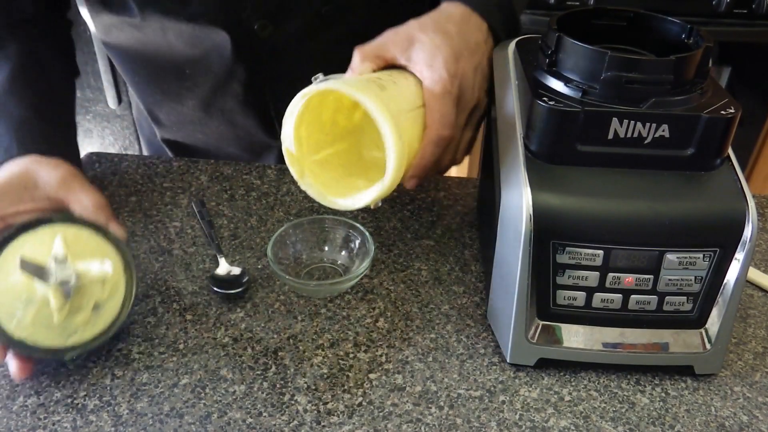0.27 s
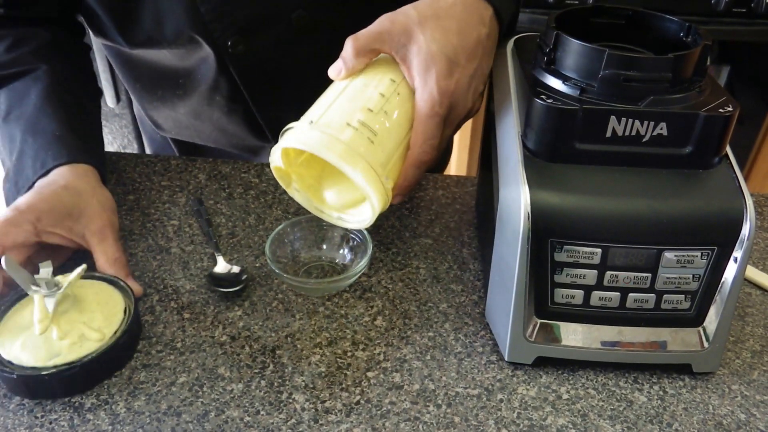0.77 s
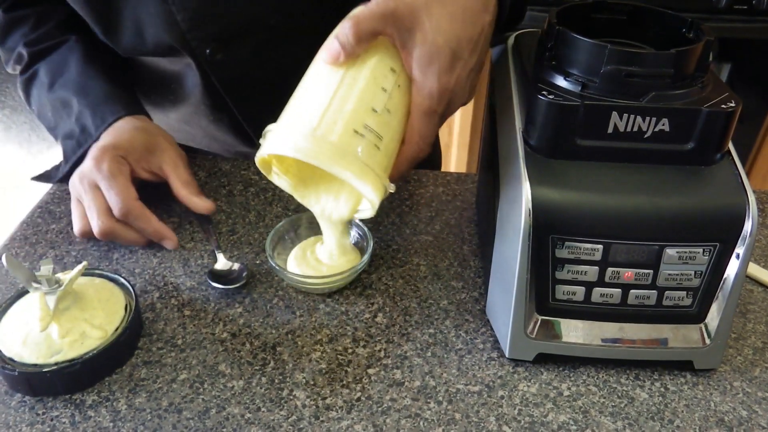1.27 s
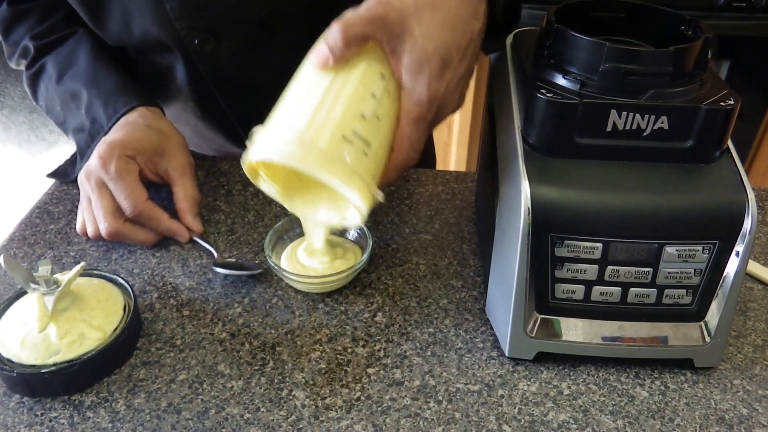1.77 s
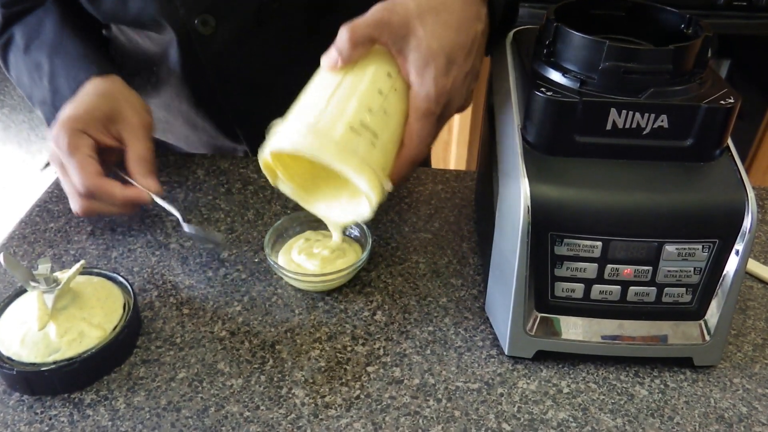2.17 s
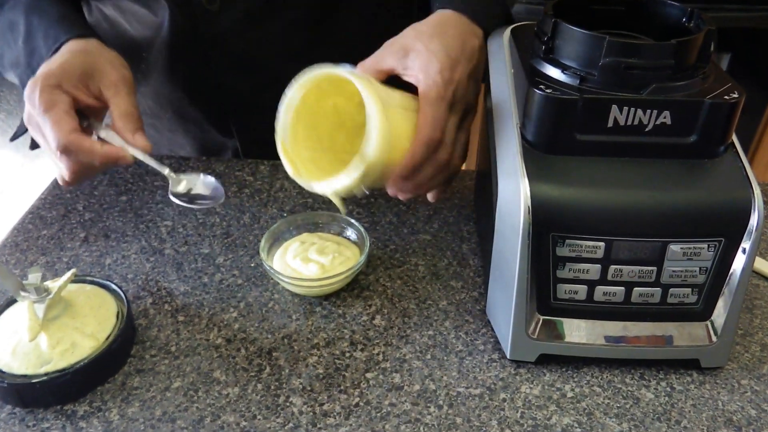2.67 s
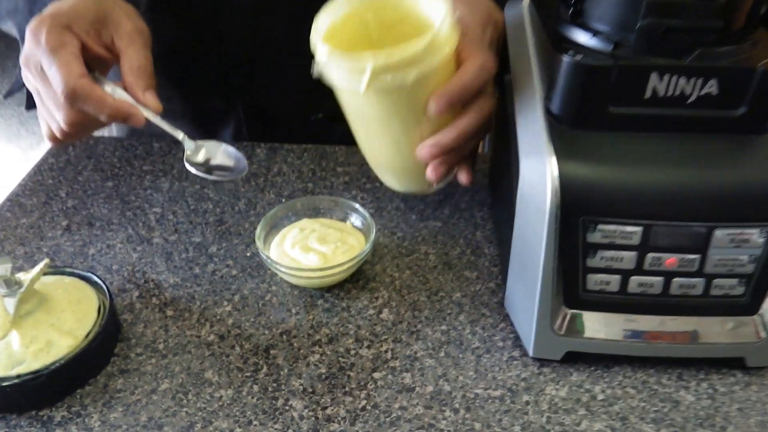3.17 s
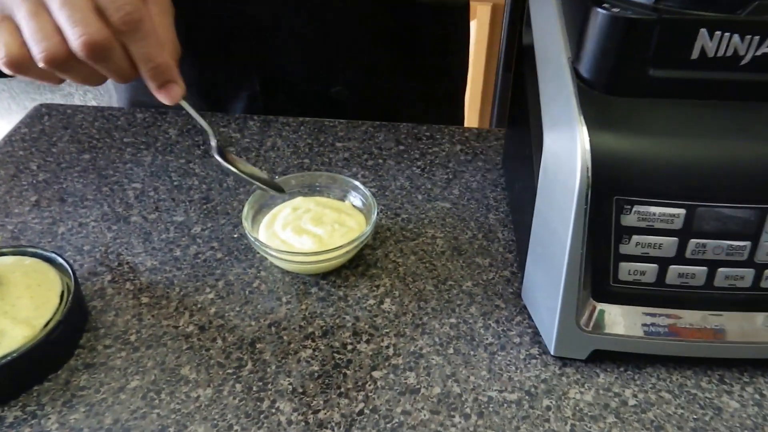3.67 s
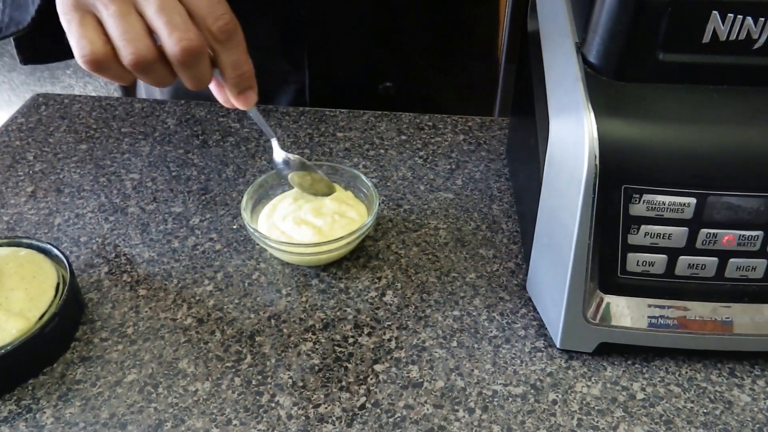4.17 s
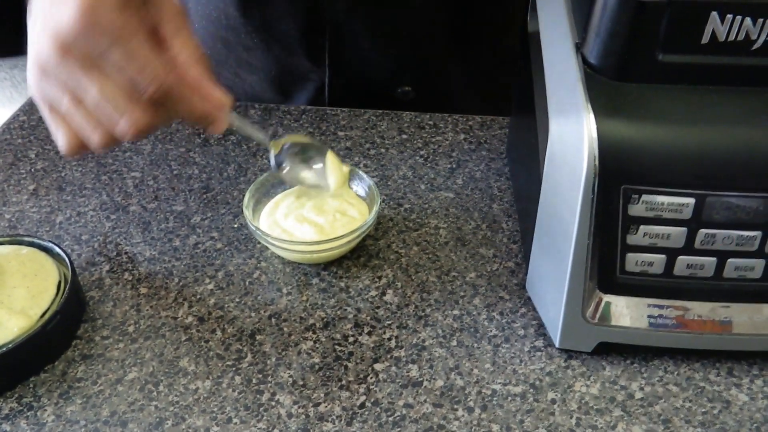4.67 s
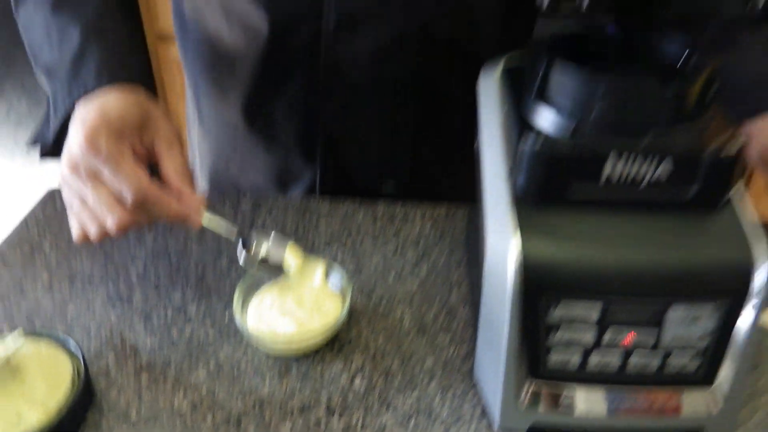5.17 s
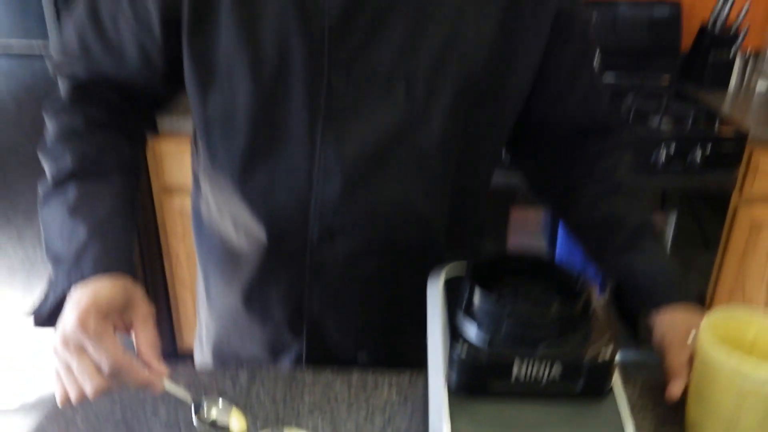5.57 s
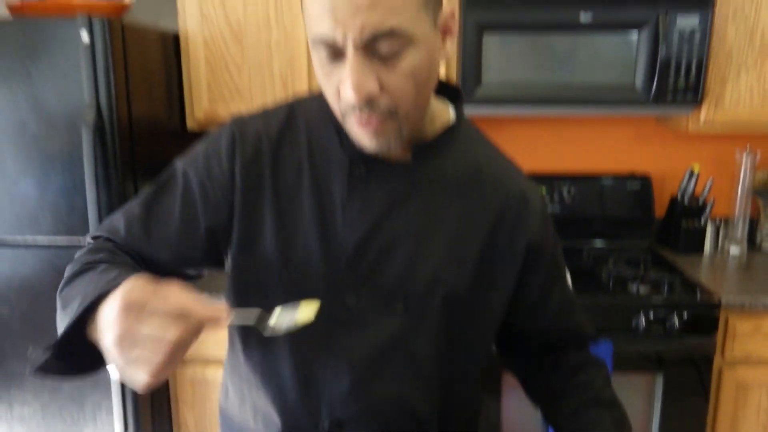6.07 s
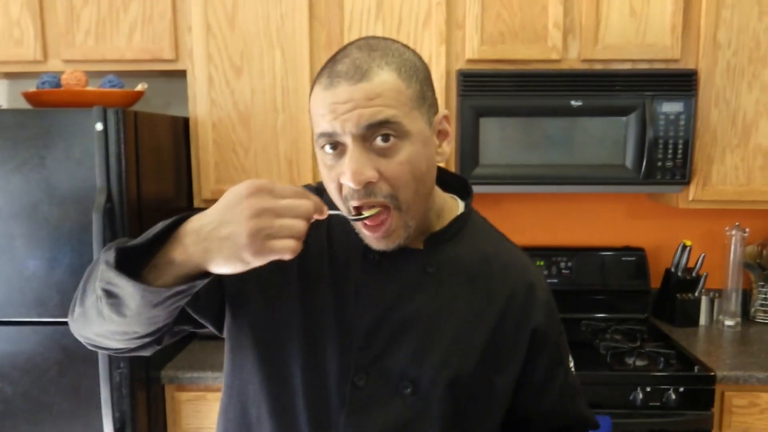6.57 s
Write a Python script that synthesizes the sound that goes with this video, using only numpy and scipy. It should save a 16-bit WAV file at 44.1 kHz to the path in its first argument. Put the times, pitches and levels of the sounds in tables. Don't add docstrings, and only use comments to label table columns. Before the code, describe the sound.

Scattered kitchen handling: plastic lid slap, ringing spoon drag, hollow cup thuds, bright glass taps, then only soft cloth rustle and a low fridge hum.

```python
import sys
import numpy as np
from scipy import signal
from scipy.fft import rfft, irfft, next_fast_len
from scipy.io import wavfile
from scipy.ndimage import uniform_filter1d

SR = 44100
rng = np.random.default_rng(int(sys.argv[2]) if len(sys.argv) > 2 else 0)


def transcribe(signal):
    frames = np.atleast_2d(signal).T
    limited = np.clip(frames, -1, 1)
    pcm = np.round(limited * 32767).astype(np.int16)
    wavfile.write(sys.argv[1], SR, pcm)


def level_to_linear(level):
    exponent = np.asarray(level, float) / 20
    return 10 ** exponent


N = 300100


def colour(x, shape):
    hz, db = np.transpose(shape)
    size = next_fast_len(len(x))
    log_hz = np.log(np.fft.rfftfreq(size, 1 / SR) + 1)
    gain = level_to_linear(np.interp(log_hz, np.log(hz), db))
    y = irfft(rfft(x, size) * gain, size)[:len(x)]
    return y / np.std(y)


def walk(rate):
    hold = int(SR / rate)
    steps = np.repeat(rng.standard_normal(N // hold + 1), hold)
    return 1.55 * uniform_filter1d(uniform_filter1d(steps, hold), hold)[:N]


# (frequency [Hz], T60 [s])
ROOM_T60 = [(100, 0.42), (400, 0.4), (1500, 0.49), (4000, 0.29), (8000, 0.25), (13000, 0.063)]


def room():
    t = np.arange(int(.5 * SR)) / SR
    hz, t60 = np.transpose(ROOM_T60)
    out = 0
    for f in [*60 * 2 ** np.arange(8), 14000]:
        band = signal.butter(2, [f / np.sqrt(2), f * np.sqrt(2)], "band", fs=SR, output="sos")
        decay = np.exp(-np.log(1000) * t / np.interp(np.log(f), np.log(hz), t60))
        out = out + signal.sosfilt(band, rng.standard_normal(len(t))) * decay
    out *= 1 - np.exp(-t / 0.0032)
    return out / np.sqrt(np.sum(out ** 2))


def partials(hz, shape):
    return np.column_stack([hz, shape])


def ring(modes):
    hz, width, db = np.transpose(modes)[:, :, None]
    t = np.arange(int(.4 * SR)) / SR
    width = np.maximum(width, 3)
    damped = np.sin(2 * np.pi * hz * t) * np.exp(-np.pi * width * t)
    y = np.sum(level_to_linear(db) * width * damped, axis=0)
    return y / np.max(np.abs(y))


def burst(decay_ms, shape, count):
    t = np.arange(count) / SR
    snap = 1 + 1.8 * np.exp(-t / 0.00027)
    envelope = snap * np.exp(-1000 * t / max(decay_ms, .2)) * (1 - np.exp(-t / .0001))
    x = rng.standard_normal(count) * envelope
    tones = rfft(x)
    even = irfft(tones / np.sqrt(uniform_filter1d(np.abs(tones) ** 2, size=50)), count)
    y = colour(even, shape) * (t < t[-1] / 2)
    return y * np.sqrt(np.sum(x ** 2) / np.sum(y ** 2))


def knocks(events, modes, crack_colour, crack_ms, ring_room_db=0, caught_db=0):
    out, body = np.zeros(N + 2 * SR), ring(modes)
    caught = np.clip((np.arange(len(body)) / SR - .009) / 0.0023, 0, 1)
    body = body * level_to_linear(caught_db * caught)
    crack_per_contact = 9.7
    for s, db, crack_db, room_db, contact_ms in events:
        crack = burst(crack_ms + crack_per_contact * contact_ms, crack_colour, count=8192)
        crack = np.pad(crack, (0, len(body) - len(crack)))
        soft = np.exp(-1000 / SR / max(contact_ms, .003))
        y = body * level_to_linear(np.array([[0], [ring_room_db]])) + level_to_linear(crack_db) * crack / 2
        direct, feed = level_to_linear(db) * signal.lfilter([(1 - soft) ** 2], [1, -2 * soft, soft ** 2], y)
        heard = level_to_linear(room_db) * signal.fftconvolve(feed, room())
        heard[:len(direct)] += direct
        out[int(s * SR):][:len(heard)] += heard
    return out[:N]


def rub(stroke, modes, rasp_colour, rasp_db):
    t = np.arange(N) / SR
    s, db = np.transpose(stroke)
    fade = np.clip(np.minimum(t - s[0], s[-1] - t) / 0.02, 0, 1)
    uneven_db, patchy_db = 3.5, 2.5
    roughness = uneven_db * np.minimum(rng.exponential(size=N), 3) + patchy_db * walk(70)
    grit = rng.standard_normal(N) * level_to_linear(roughness)
    grit *= rng.random(N) < .3
    force = level_to_linear(np.interp(t, s, db)) * fade
    body = ring(modes)
    rung = signal.fftconvolve(force * grit / np.std(grit), body / np.sqrt(np.sum(body ** 2)))[:N]
    return rung + level_to_linear(rasp_db) * force * colour(grit, rasp_colour)


# (frequency [Hz], density [dB per Hz])
HOUSE = [(12, -23.5), (25, -10.5), (60, -4), (130, -1), (250, -6.5), (500, -40)]


def house_rumble():
    return level_to_linear(-64.5 + 2.5 * walk(3)) * colour(rng.standard_normal(N), HOUSE)


# (frequency [Hz], density [dB per Hz])
MIC_HISS = [(2000, -19.5), (8000, -4), (15000, 0.5)]


def microphone_hiss():
    return level_to_linear(-79.5) * colour(rng.standard_normal(N), MIC_HISS)


# (time [s], depth [dB], fall [s])
DUCKS = [
    (.905, 7, .05),
    (3.01, 8, 0.045),
    (4.105, 9, 0.13),
    (4.67, 1.6, 0.11),
    (5.01, 10, .05),
    (5.189, 14, 0.15),
]


def gain_control():
    hold_s, recover_db_per_s, resting_db = 0.15, 12.5, -42
    t = np.arange(N) / SR
    gain_db = resting_db
    for s, db, fall in DUCKS:
        times = s + np.cumsum([0, max(fall, .01), hold_s, abs(db) / recover_db_per_s])
        gain_db = gain_db - np.interp(t, times, [0, db, db, 0])
    return level_to_linear(gain_db)


# (frequency [Hz], density [dB per Hz])
FRIDGE_AIR = [(15, -47.5), (25, -20.5), (49, -9.5), (87, -12), (137, -3.5), (190, -5.5), (217, -0.5),
              (263, -10), (285, -3.5), (476, -9), (714, -8), (775, -15.5), (6210, -26), (14400, -36),
              (16000, -36.5)]
# (frequency [Hz], rms level [dB])
FRIDGE_LINES = [(59.2, -54), (145.3, -49.5), (183.0, -53.5), (220.7, -50), (290.7, -59.5), (328.4, -57),
                (366.1, -59.5), (436.0, -56.5), (473.7, -56), (549.1, -60.5), (1008, -66), (2040, -68.5)]


def fridge():
    t = np.arange(N) / SR
    hum = 0
    for hz, db in FRIDGE_LINES:
        level = np.sqrt(2) * level_to_linear(db + 1.5 * walk(8.2))
        cycles = hz * t + rng.random() + 0.21 * walk(4.3)
        hum = hum + level * np.sin(2 * np.pi * cycles)
    air = colour(rng.standard_normal(N), FRIDGE_AIR) * level_to_linear(1.0 * walk(15))
    return gain_control() * (level_to_linear(-2.5) * air + level_to_linear(41.5) * hum)


# (time of fastest motion [s], length [s], level [dB], brightness [0-1])
SLEEVE = [(0.064, 0.44, -49.5, .5), (0.347, 0.53, -36.5, 0.7), (0.635, 0.19, -39, 0.67),
          (1.15, 0.45, -38, 0), (1.422, 0.33, -47, 0.4), (1.95, 0.53, -45, .45), (2.358, 0.7, -39, 0.37),
          (3.533, 0.28, -45, 0.36), (3.723, 0.22, -38.5, 0.36), (3.89, 0.36, -44.5, 0.3),
          (5.492, 0.34, -59.5, 0.2), (6.659, 1, -46, 0.2)]
# (frequency [Hz], density [dB per Hz])
CLOTH_DULL = [(400, -28.5), (1000, -8), (2000, -10.5), (5000, -7.5), (8000, -10), (15000, -24.5)]
# (frequency [Hz], density [dB per Hz])
CLOTH_BRIGHT = [(400, -32), (2000, -0.5), (4500, 2.5), (6500, 8.5), (9000, -34.5), (15000, -19)]


def sleeves():
    s, length, db, bright = np.transpose(SLEEVE)[:, :, None]
    bright = np.clip(bright, 0, 1)
    phase = np.clip((np.arange(N) / SR - s) / length, -.5, .5)
    stroke = level_to_linear(db - 9.0) * np.cos(np.pi * phase).clip(0) ** 1.3
    grain_db = 3.8 * np.minimum(rng.exponential(size=N), 6) + 0.5 * walk(30)
    grains = rng.standard_normal((2, N)) * level_to_linear(grain_db)
    dull = np.sum(stroke * np.sqrt(1 - bright), axis=0) * colour(grains[0], CLOTH_DULL)
    return dull + np.sum(stroke * np.sqrt(bright), axis=0) * colour(grains[1], CLOTH_BRIGHT)


# (time [s], peak [dB], frequency [Hz], width [Hz])
THUMPS = [
    (0.473, -29, 80, 13),
    (.906, -29, 75, 14),
    (4.107, -26, 65, 12),
    (5.009, -30.5, 105, 13),
]


def slab_thumps():
    s, db, hz, width = np.transpose(THUMPS)[:, :, None]
    t = np.maximum(np.arange(N) / SR - s, 0)
    swell = np.exp(-np.pi * width * t) * (1 - np.exp(-t / 0.018))
    return np.sum(level_to_linear(db) * np.sin(2 * np.pi * hz * t) * swell, axis=0)


# (time [s], ring peak [dB], crack over ring [dB], room share [dB], contact [ms])
CRUMBS = [(6.281, -47, 11, -14, 0.028), (1.8846, -54, 10, -18, .01), (2.4847, -42, 11, -5, 0.011),
          (3.329, -54, 10, -18, .02), (4.2345, -46, 12, -10, 0.014), (5.5144, -64, 12.6, -6, 0.053),
          (6.457, -50, 11, -15, .02)]
# (frequency [Hz], width [Hz], level [dB])
CRUMB = [(6500, 2500, -1)]
# (frequency [Hz], density [dB per Hz])
CRUMB_CRACK = [(1000, -18), (3000, 4), (6000, 3.5), (10000, 0.5), (15000, -15)]
# (time [s], ring peak [dB], crack over ring [dB], room share [dB], contact [ms])
SMALL_TICK = [(.4185, -26.5, 3, -13.5, 0.03), (5.478, -53, 2.5, -12, .03), (5.513, -63, 5.5, -8, .02),
              (6.158, -58, 3, -14, .03), (6.1955, -30.5, 5.7, -13, 0.04)]
# (frequency [Hz], width [Hz], level [dB])
TICK = [(920, 74, -8), (1430, 150, -1), (3245, 170, -11)]
# (frequency [Hz], density [dB per Hz])
TICK_CRACK = [(350, -40.5), (600, -12), (2210, -17), (3250, 3.5), (3890, -17), (8860, -15.5),
              (16000, -34.5)]


def crumbs_and_ticks():
    return knocks(SMALL_TICK, TICK, TICK_CRACK, 2.7) + knocks(CRUMBS, CRUMB, CRUMB_CRACK, 2.1)


# (time [s], ring peak [dB], crack over ring [dB],
# room share [dB], contact [ms])
PRE_CLICK = [(6.1922, -30.5, 4, -7, .02)]
# (time [s], ring peak [dB], crack over ring [dB], room share [dB], contact [ms])
GRAZES = [(7.2, -44, 9.3, -12, .012), (6.575, -41, 8, -12, .09), (4.38, -54, 6, -12, .03),
          (6.415, -48.5, 9.7, -16, .008)]


def faint_grazes():
    return knocks(PRE_CLICK, TICK, TICK_CRACK, 1.6) + knocks(GRAZES, CRUMB, CRUMB_CRACK, 2.2)


# (time [s], ring peak [dB], crack over ring [dB], room share [dB], contact [ms])
LID_PIP = [
    (.3664, -26, -2, -14, .015),
    (.4185, -35, 1.5, -14, .015),
]
# (frequency [Hz], width [Hz], level [dB])
LID_PIP_BODY = [(3400, 120, 0.5), (5600, 160, -1), (7900, 200, -1.5)]
# (time [s], ring peak [dB], crack over ring [dB], room share [dB], contact [ms])
LID_SNAP = [(.9043, -20.5, 12, -30.5, 0.0072)]
# (frequency [Hz], density [dB per Hz])
SNAP_CRACK = [(4000, -29), (9000, -6.5), (12000, 1), (16000, 1.5)]


def faint_lid():
    return knocks(LID_PIP, LID_PIP_BODY, CRUMB_CRACK, 1.5) + knocks(LID_SNAP, CRUMB, SNAP_CRACK, .6)


# (time [s], ring peak [dB], crack over ring [dB], room share [dB], contact [ms])
CUP_ROCK = [
    (4.1078, -23.5, 6.9, -3, .03),
    (4.1112, -15, 7, -16, .03),
]
# (frequency [Hz], width [Hz], level [dB])
CUP_BASE = [(223, 7.7, -9.5), (273, 27.5, 5.5), (464, 22, -8), (543, 19, -16), (1032, 74, -20.5)]
# (frequency [Hz], density [dB per Hz])
CUP_BASE_CRACK = [(90, -43.5), (170, -32.5), (300, -20), (800, -11), (1660, -14), (3000, -16.5),
                  (5200, -13.5), (9000, -19.5), (16000, -36)]


def faint_cup():
    return knocks(CUP_ROCK, CUP_BASE, CUP_BASE_CRACK, 1.5)


# (time [s], ring peak [dB], crack over ring [dB], room share [dB], contact [ms])
SCOOP_REBOUND = [(4.6706, -11, 3, -20, .015)]
GLASS_HZ = [2100, 4345, 4535, 4790, 7550, 7785, 7915, 8015, 8175, 8275, 12120]
# (width [Hz], level [dB])
BOWL = [(60, -4), (90.6, -11.5), (88.7, -22), (90.4, -16.5), (120, -21), (90.5, -20), (80, 22),
        (59.7, -17.5), (60.1, -17), (60.2, -20.5), (60, -26)]
# (frequency [Hz], density [dB per Hz])
BOWL_CRACK = [(300, -34), (1000, -16.5), (3080, -6.5), (3700, -14), (4800, 5.5), (6850, -16), (7800, -7.5),
              (9390, -36.5), (16000, -47)]
# (time [s], level [dB])
STIR = [(4.27, -70), (4.33, -66), (4.45, -68.5), (4.56, -65.5), (4.66, -61.5)]
# (frequency [Hz], width [Hz], level [dB])
BOWL_STIRRED = [(4200, 15, 0.5), (7915, 20, -18)]


def faint_bowl():
    rebound = knocks(SCOOP_REBOUND, partials(GLASS_HZ, BOWL), BOWL_CRACK, 1.8)
    return rebound + rub(STIR, BOWL_STIRRED, BOWL_CRACK, rasp_db=-21)


# (time [s], level [dB])
CARRY = [(1.84, -66), (1.87, -64), (1.95, -67), (2.02, -61), (2.06, -62)]
# (frequency [Hz], width [Hz], level [dB])
SPOON_CARRIED = [(6410, 30, -10), (11885, 18, 0.5)]
# (frequency [Hz], density [dB per Hz])
SPOON_CRACK = [(200, -9.5), (800, -12.5), (1500, -3.5), (2700, -3), (4350, -11), (6520, -6.5), (9230, -17),
               (12200, -25.5), (16000, -34.5)]
# (time [s], ring peak [dB], crack over ring [dB], room share [dB], contact [ms])
SPOON_NUDGES = [
    (2.0545, -40, -2, -12, .03),
    (2.073, -41, -2, -12, .03),
    (4.598, -45, 3.5, -9.5, .03),
    (4.6445, -40, 2.5, -14.5, .02),
]
# (frequency [Hz], width [Hz], level [dB])
NUDGE_BODY = [(2380, 250, -6), (3500, 200, 1), (5100, 300, -1.5)]


def faint_spoon():
    carried = rub(CARRY, SPOON_CARRIED, SPOON_CRACK, rasp_db=-15)
    return carried + knocks(SPOON_NUDGES, NUDGE_BODY, BOWL_CRACK, 2.5)


# (time [s], level [dB])
LID_SLIDE = [(.85, -60), (.875, -55), (.895, -53), (.92, -53)]
# (frequency [Hz], density [dB per Hz])
LID_SCUFF = [(2000, -23), (4500, -9.5), (6300, -5), (7500, -13.5), (12000, -19)]


def lid_slide():
    return rub(LID_SLIDE, CRUMB, LID_SCUFF, rasp_db=6.5)


# (time [s], level [dB])
SCRAPES = [
    [(4.575, -63), (4.597, -59), (4.627, -71), (4.645, -50.5), (4.655, -67)],
    [(4.686, -42), (4.7, -37), (4.716, -46.5)],
]


def bowl_scrapes():
    return sum(rub(stroke, partials(GLASS_HZ, BOWL), BOWL_CRACK, rasp_db=7.0) for stroke in SCRAPES)


SPOON_HZ = [1575, 2980, 4300, 4615, 4885, 6410, 8270, 8650, 10290, 11885, 12910]
# (time [s], level [dB])
DRAG = [(1.7, -58), (1.745, -44.5), (1.765, -39), (1.788, -35.5), (1.808, -42), (1.83, -50.5),
        (1.852, -41.5), (1.87, -56), (1.9, -56)]
# (width [Hz], level [dB])
SPOON_FREE = [(60, -12), (45, -8), (59.7, -33), (60, -35), (60, -11), (28, 1), (45, -3.5), (30, -7.5),
              (25, -14.5), (24, 4), (50, -9.5)]
# (time [s], level [dB])
TIP = [(1.88, -54), (1.915, -47), (1.932, -48), (1.96, -70), (2.038, -59), (2.084, -48.5), (2.15, -59)]
# (width [Hz], level [dB])
SPOON_TIPPED = [(50, 9), (40, -16), (60, -25), (40, -5), (40, -15), (30, -8), (40, -25), (25, -20),
                (25, -25), (45, -6), (35, -30)]
# (time [s], level [dB])
LIFT_OFF = [(2.035, -62), (2.058, -41), (2.07, -60), (2.087, -38.5), (2.135, -60.5)]
# (width [Hz], level [dB])
SPOON_RAISED = [(45, -5), (50, -24), (60, -30), (35, -10), (50, -20), (30, -2), (45, -22), (25, -10),
                (30, -24), (35, 2), (45, -22)]


def spoon_drag():
    pull = rub(DRAG, partials(SPOON_HZ, SPOON_FREE), SPOON_CRACK, rasp_db=-6.5)
    tip = rub(TIP, partials(SPOON_HZ, SPOON_TIPPED), SPOON_CRACK, rasp_db=-3)
    lift = rub(LIFT_OFF, partials(SPOON_HZ, SPOON_RAISED), SPOON_CRACK, rasp_db=-5)
    return pull + tip + lift


# (time [s], ring peak [dB], crack over ring [dB], room share [dB], contact [ms])
STAND_KNOCK = [(5.0064, -1.6, 4, -17, 0.023)]
# (frequency [Hz], width [Hz], level [dB])
STAND = [(196, 12, -9.5), (305, 39, -5), (406, 31, -8), (601, 64, -1), (710, 60, -6.5), (1417, 80, -18)]
# (frequency [Hz], density [dB per Hz])
STAND_CRACK = [(80, -30.5), (250, -7.5), (700, -2), (1500, -22), (2300, -13), (3800, -20.5), (6000, -24),
               (10000, -36), (16000, -47)]
# (time [s], ring peak [dB], crack over ring [dB], room share [dB], contact [ms])
STAND_ECHO = [
    (5.2574, -22.5, 2.5, -5, 0.092),
    (5.276, -33, -3, -8, 0.38),
]
# (frequency [Hz], width [Hz], level [dB])
STAND_FOOT = [(294, 47, -4), (437, 65, -5), (634, 73, -2.5)]


def stand_blows():
    knock = knocks(STAND_KNOCK, STAND, STAND_CRACK, 1.2, ring_room_db=5)
    return knock + knocks(STAND_ECHO, STAND_FOOT, STAND_CRACK, 1.4, ring_room_db=2.5)


# (time [s], ring peak [dB], crack over ring [dB], room share [dB], contact [ms])
BOWL_SCOOP = [
    (4.6414, -38, -6.5, -14, 0.021),
    (4.6669, -8.5, 3.5, -15, 0.014),
    (4.7186, -20.5, 9, -22, 0.078),
]
# (time [s], ring peak [dB], crack over ring [dB], room share [dB], contact [ms])
BOWL_TAP = [
    (5.1852, -9, 14.2, -18, 0.015),
    (5.1928, -24.5, 15, -26, .03),
]
# (frequency [Hz], width [Hz], level [dB])
BOWL_RIM = [(5595, 30, -22), (6400, 30, -22), (7550, 25, -13), (7790, 12, -3), (7910, 8, 3), (8020, 12, -1),
            (8172, 24, -5), (8275, 18, -8), (8436, 50, -8), (11900, 30, -15), (12120, 16, -9),
            (12300, 35, -14)]
# (frequency [Hz], density [dB per Hz])
BOWL_RIM_CRACK = [(200, -34), (500, -7), (1500, -20), (3200, -5), (4300, -8.5), (5300, 2.5), (7000, -7.5),
                  (8200, 0.5), (10900, -25), (14500, -23.5), (16500, -45)]
# (time [s], ring peak [dB], crack over ring [dB], room share [dB], contact [ms])
GLASS_CHIME = [
    (4.204, -46, -18, -12, 0.023),
    (5.4385, -54, -12, -6, 0.0202),
]


def bowl_blows():
    glass_to_room_db = 8
    scoop = knocks(BOWL_SCOOP, partials(GLASS_HZ, BOWL), BOWL_CRACK, 2.6, glass_to_room_db - 6.0)
    tap = knocks(BOWL_TAP, BOWL_RIM, BOWL_RIM_CRACK, .8, glass_to_room_db)
    return scoop + tap + knocks(GLASS_CHIME, BOWL_RIM, BOWL_CRACK, 1.4)


# (time [s], ring peak [dB], crack over ring [dB], room share [dB], contact [ms])
SPOON_LIFT = [
    (2.0533, -40, 7.5, -13, 0.05),
    (2.0718, -42, 10, -14, .06),
    (2.1031, -33, 3.2, -8, 0.021),
    (2.1688, -11, 3, -12.5, 0.015),
    (2.1845, -24.5, 15.6, -4, .075),
]
# (width [Hz], level [dB])
SPOON = [(39.8, -4.5), (80, -6), (60, -39), (30, -10.5), (60, -34), (22, -4), (40, -32), (15, -8),
         (14.1, -2), (34, -4.5), (40, -29.5)]
# (time [s], ring peak [dB], crack over ring [dB], room share [dB], contact [ms])
SPOON_RIM = [
    (4.0446, -3, 4.3, -21.5, 0.014),
    (4.0526, -8.5, 1.5, -9, 0.028),
]
# (frequency [Hz], width [Hz], level [dB])
SPOON_HELD = [(938, 41, -8.5), (1756, 55, -17.5), (4340, 61, -7.5), (5250, 67, -17), (6530, 57, 1.5),
              (7670, 29, -2.5), (8800, 28, -8.5), (10350, 37, -17.5), (11940, 25, -12), (12900, 40, -18)]
# (frequency [Hz], density [dB per Hz])
RIM_CRACK = [(120, -33.5), (200, -28), (2800, -8), (3830, -20), (4430, -5.5), (6520, -6.5), (9580, -21),
             (11500, -12.5), (16000, -40.5)]


def spoon_blows():
    lift = knocks(SPOON_LIFT, partials(SPOON_HZ, SPOON), SPOON_CRACK, 1.9)
    return lift + knocks(SPOON_RIM, SPOON_HELD, RIM_CRACK, .8, ring_room_db=2.5, caught_db=-6)


# (time [s], ring peak [dB], crack over ring [dB], room share [dB], contact [ms])
CUP_BUMP = [
    (3.0077, -2.5, 0.5, -22, 0.028),
    (3.0108, -2, -1, -15, 0.065),
]
# (frequency [Hz], width [Hz], level [dB])
CUP = [(120.3, 3.8, 5), (208, 164, 1), (277, 15, -13), (385, 43, -4), (586, 85, 0.5), (682, 22, -11),
       (1190, 114, -9.5), (1875, 14, -17)]
# (frequency [Hz], density [dB per Hz])
CUP_CRACK = [(70, -30), (200, -5), (666, -10.5), (1340, -10), (2000, -20.5), (3000, -19), (6700, -16.5),
             (8500, -29), (16000, -42)]
# (time [s], ring peak [dB], crack over ring [dB], room share [dB], contact [ms])
CUP_NUDGE = [(2.9365, -19.5, -6, -4, 0.36)]
# (frequency [Hz], width [Hz], level [dB])
CUP_WALL = [(250, 49, -14), (440, 75, 3), (637, 55, -7)]
# (time [s], ring peak [dB], crack over ring [dB], room share [dB], contact [ms])
CUP_DOWN = [
    (4.1018, -12, 7.5, -9, 0.015),
    (4.1035, -2.5, 1, -17.5, 0.026),
]


def cup_blows():
    bump = knocks(CUP_BUMP, CUP, CUP_CRACK, .8, ring_room_db=3.5)
    nudge = knocks(CUP_NUDGE, CUP_WALL, STAND_CRACK, 1.3)
    return bump + nudge + knocks(CUP_DOWN, CUP_BASE, CUP_BASE_CRACK, 1.7)


# (time [s], ring peak [dB], crack over ring [dB], room share [dB], contact [ms])
LID_DOWN = [
    (.4718, -11, 13.5, -9.5, 0.022),
    (.4950, -24, 11, -9, 0.051),
]
# (frequency [Hz], width [Hz], level [dB])
LID = [(214, 62, -9), (406, 31, 2), (3730, 330, -23.5)]
# (frequency [Hz], density [dB per Hz])
LID_CRACK = [(35, -42.5), (60, -9), (330, 0.5), (550, -5.5), (1350, -10), (2050, -22), (2650, -12),
             (4220, -15), (5090, -11.5), (14200, -35.5), (16000, -49.5)]
# (time [s], ring peak [dB], crack over ring [dB], room share [dB], contact [ms])
LID_ROCK = [
    (.8905, -21.5, -18, -23.5, 0.055),
    (.8935, -15.5, -12, -22, 0.1),
]
# (frequency [Hz], width [Hz], level [dB])
LID_EDGE = [(720, 28, 2.5), (480, 61, -13.5)]
# (time [s], ring peak [dB], crack over ring [dB], room share [dB], contact [ms])
LID_SETTLE = [
    (.9003, -7.5, 6, -18, 0.05),
    (.9022, -7, 9, -11, 0.042),
    (.9044, -2, 8.5, -16, 0.028),
    (.9082, -14, 4, -10.5, 0.06),
    (.9130, -17, 5, -6.5, 0.062),
]
# (frequency [Hz], width [Hz], level [dB])
LID_FLAT = [(472, 110, -0.5), (758, 250, -5), (1402, 160, 10.5), (2900, 690, -6.5), (4860, 330, 5.5)]
# (frequency [Hz], density [dB per Hz])
LID_FLAT_CRACK = [(100, -39.5), (400, -6), (750, -1.5), (1050, -8), (1500, -4.5), (3000, -0.5), (5800, 0),
                  (8500, -18.5), (14600, -22), (16500, -30.5)]
# (time [s], ring peak [dB], crack over ring [dB], room share [dB], contact [ms])
LID_BOUNCE = [
    (.9322, -10, 4.4, -18.5, 0.035),
    (.9348, -15.5, 7.8, -8, 0.055),
]


def lid_blows():
    down = knocks(LID_DOWN, LID, LID_CRACK, 1.5)
    rock = knocks(LID_ROCK, LID_EDGE, LID_CRACK, 4.2)
    settle = knocks(LID_SETTLE, LID_FLAT, LID_FLAT_CRACK, 1.2)
    return down + rock + settle + knocks(LID_BOUNCE, LID_FLAT, LID_FLAT_CRACK, 1.5)


def scene():
    background = house_rumble() + microphone_hiss() + fridge() + sleeves() + slab_thumps()
    faint = faint_grazes() + faint_lid() + faint_cup() + faint_bowl() + faint_spoon()
    slide = lid_slide() + bowl_scrapes() + spoon_drag()
    tail = signal.fftconvolve(level_to_linear(-11.5) * slide, room())[:N]
    hits = crumbs_and_ticks() + stand_blows() + bowl_blows() + spoon_blows() + cup_blows() + lid_blows()
    rumble_cut = signal.butter(4, 125, "high", fs=SR, output="sos")
    return (background + faint + signal.sosfilt(rumble_cut, hits + tail + slide))[None]


def low_pass(x):
    return signal.sosfilt(signal.butter(12, 15780, fs=SR, output="sos"), x)


def record(dry):
    top = .8
    flattened = dry / (1 + np.abs(dry / top) ** 6) ** (1 / 6)
    edge = signal.ellip(8, .3, 70, 16400, fs=SR, output="sos")
    return low_pass(signal.sosfiltfilt(edge, flattened))


dry = scene()
out = record(dry)
transcribe(out)
```